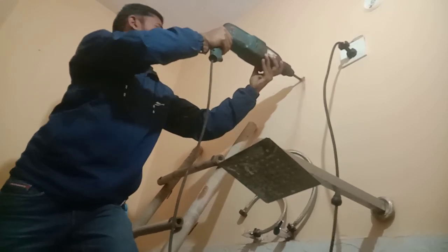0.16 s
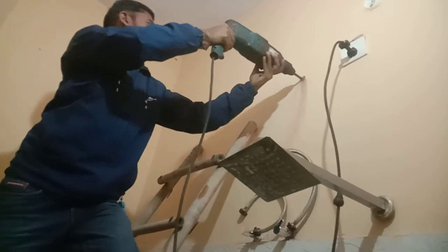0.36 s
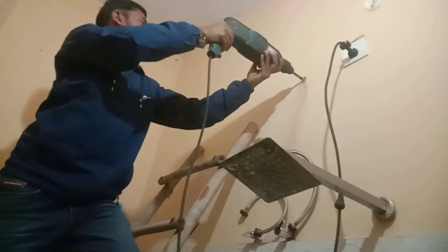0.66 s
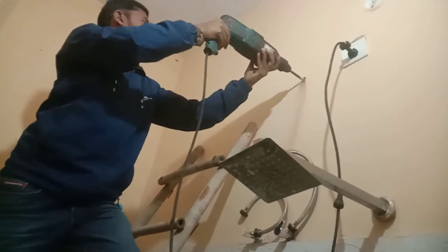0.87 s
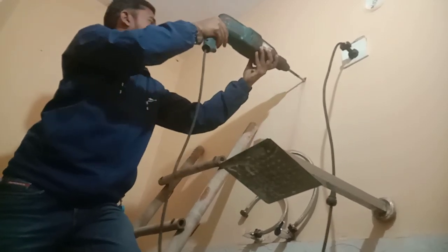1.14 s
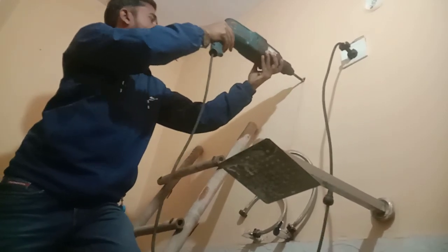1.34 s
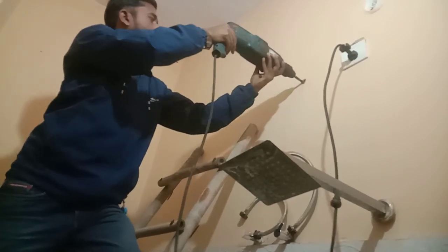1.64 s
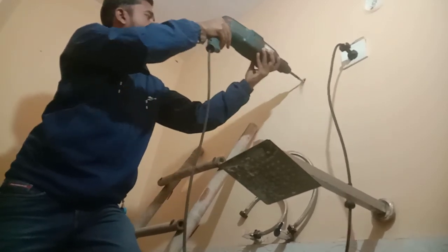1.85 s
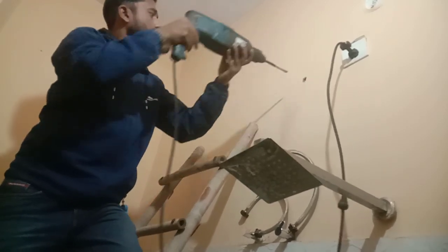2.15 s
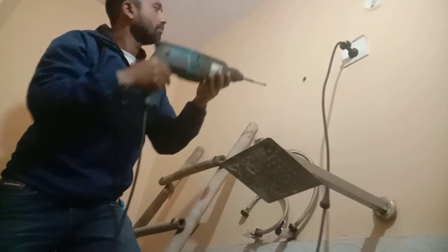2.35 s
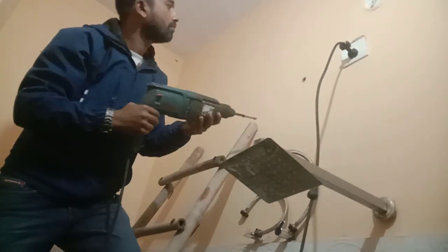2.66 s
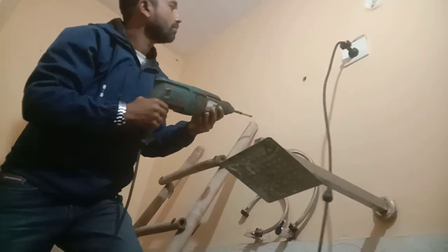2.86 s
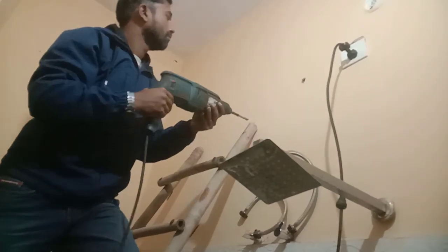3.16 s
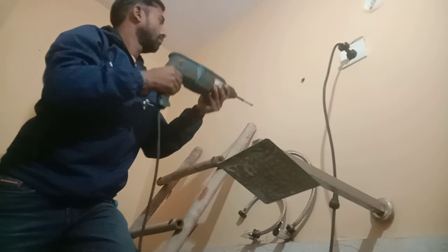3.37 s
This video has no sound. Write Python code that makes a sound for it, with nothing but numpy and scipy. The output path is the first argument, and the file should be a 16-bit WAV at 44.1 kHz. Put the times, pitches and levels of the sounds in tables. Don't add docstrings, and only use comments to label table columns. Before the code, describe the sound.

Loud rotary drill hammering into a wall stops, grinds down and is pulled free, faint rustling after

```python
import sys
import numpy as np
from scipy import signal
from scipy.fft import rfft, irfft, next_fast_len
from scipy.io import wavfile

SR = 44100
rng = np.random.default_rng(int(sys.argv[2]) if len(sys.argv) > 2 else 0)


def bounce(signal):
    frames = np.transpose(np.atleast_2d(signal))
    limited = np.clip(frames, -1, 1)
    pcm = np.round(limited * 32767).astype(np.int16)
    wavfile.write(sys.argv[1], SR, pcm)


def nominal_scale(level):
    x = np.asarray(level, float) / 20
    return 10 ** x


N = 154350

# pitch_hz, level_db (per Hz)
ROOM_TONE = [(40, -17.5), (65, -18), (100, 2.5), (160, -1.5), (260, -16), (700, -26), (3000, -33.5),
             (7000, -33.5), (15500, -42)]
# time_s, level_db
ROOM_TONE_LEVEL = [(0, -66), (1.2, -66), (1.6, -50), (2.1, -56), (2.4, -54.5), (2.6, -59), (3.0, -51),
                   (3.5, -55)]
# start_s, peak_db, centre_hz, t60_s
TICKS = [(2.656, -53, 950, 0.35), (2.66, -55, 400, 0.43), (2.787, -50, 7000, .05),
         (2.826, -52, 2500, 0.082), (2.86, -51, 8000, .1), (3.167, -53.5, 2600, 0.28),
         (3.167, -54, 6200, 0.28), (1.96, -28, 3000, 0.45), (2.12, -59, 5550, .9),
         (2.272, -53.5, 1900, 0.69), (3.30, -61, 1700, 0.57), (3.42, -55, 2107, 0.307)]
# start_s, peak_db, pitch_hz, t60_s
BUMPS = [
    (1.66, -50, 105, 0.25),
    (3.216, -40, 102, 0.12),
]
# time_s, level_db, brightness_db
RUB = [(1.85, -66, 0), (1.94, -39, 8.5), (2.0, -28.5, 3.5), (2.06, -39.5, 4), (2.17, -59, -3),
       (2.262, -58, 9), (2.275, -50, -1), (2.43, -44.5, -1), (2.5, -48.5, 6), (2.6, -44, 2.5),
       (2.69, -43.5, -5), (2.76, -60, 0), (2.85, -57.5, 5.5), (2.92, -55.5, -1), (3.02, -69.5, 3),
       (3.28, -69, 7.5), (3.43, -52, -0.5), (3.5, -63, 5)]
# pitch_hz, level_db (per Hz)
CLOTH = [(300, -19.5), (950, -3.5), (1250, 1.5), (2700, 2), (5000, 1.5), (7000, -1), (10000, -5.5),
         (15500, -14.5)]
# centre_s, length_s, level_db
CASING_RING = [
    (0.802, 0.29, -43),
    (1.423, 0.041, -30),
    (1.654, 0.028, -37),
    (1.817, .08, -50.5),
    (2.424, .05, -67),
    (2.654, 0.034, -61),
    (2.841, 0.046, -64.5),
]
# time_s, level_db
GRIND = [(0, -17.5), (.5, -15.5), (1.0, -18.5), (1.62, -19.5), (1.68, -22), (1.72, -20.5), (1.78, -28),
         (1.93, -34), (2.0, -54), (2.15, -73)]
# pitch_hz, level_db (per Hz)
CASING = [(150, -39), (350, -27), (750, -11), (1200, -9), (2200, -1.5), (4000, -4.5), (9000, -16.5),
          (15500, -27)]
# start_s, peak_db
CHATTER = [
    (1.445, -34),
    (1.524, -22.5),
    (1.605, -27),
    (1.715, -50),
    (1.799, -41),
    (1.91, -48),
    (1.957, -53),
]
# time_s, pitch_hz, level_db
WHINE = [(0, 4146, -40), (.42, 4106, -42.5), (.52, 4326, -36), (.72, 3830, -28), (.9, 3022, -33),
         (1.0, 2530, -26), (1.1, 2200, -24.5), (1.22, 1837, -25), (1.38, 1340, -32), (1.5, 1080, -41.5),
         (1.6, 780, -33.5), (1.7, 550, -78)]
# time_s, level_db
HAMMER = [(0, -14.5), (.03, -12.5), (.3, -14.5), (.34, -15.5), (.4, -14.5), (.55, -19), (.68, -23),
          (1.0, -30.5), (1.3, -43), (1.7, -65), (1.8, -74.5)]
# pitch_hz, level_db (per Hz)
WALL = [(60, -22.5), (250, -11.5), (700, -3), (1200, -4), (2500, -4.5), (5000, 0), (9000, -8),
        (15500, -11.5)]
# multiple of the blow rate, level_db
THUD = [(1, -27.5), (1.4, -27.5), (2, -26), (3, -28), (5, -38), (6, -23)]
# centre_s, length_s, level_db
SQUEAL = [
    (0.121, .03, -53.5),
    (0.273, .04, -46),
    (.40, .04, -50),
]
# pitch_hz, width_hz, level_db
MIC = [(1257, 150, 5.5), (2100, 50, 4), (2613, 130, 2), (3167, 69, 0.5), (4640, 1200, -6), (5606, 100, 3),
       (6200, 150, -9), (6700, 330, 3.5), (8090, 820, -14), (12960, 4100, -18.5), (15000, 900, 8.5)]


def rms_one(x):
    return x / np.sqrt(np.mean(x ** 2) + 1e-20)


def in_time(rows):
    time_s, *columns = np.transpose(rows)
    return [np.interp(np.arange(N) / SR, time_s, column) for column in columns]


def drift(rate_hz):
    pole = np.exp(-80 * np.pi * rate_hz / SR)
    noise = rng.standard_normal(N // 40 + 2002)
    slow = signal.lfilter([1], [1, -2 * pole, pole * pole], noise)[2000:]
    return np.interp(np.arange(N) / 40, np.arange(len(slow)), rms_one(slow))


def narrow(turns, width_hz):
    phase = 2 * np.pi * turns
    return rms_one(drift(width_hz) * np.sin(phase) + drift(width_hz) * np.cos(phase))


def coloured(x, spectrum, patchy_db):
    hz = np.fft.rfftfreq(N, 1 / SR) + 1
    points = np.array(spectrum)
    shaped = rfft(x) * nominal_scale(np.interp(np.log(hz), np.log(points[:, 0]), points[:, 1]))
    place = np.clip(2 * np.log2(hz / 40), 0, 17)
    total = 0
    for k in range(18):
        band = irfft(shaped * np.clip(1 - abs(place - k), 0, 1), N)
        total = total + nominal_scale(patchy_db * drift(14)) * band
    return rms_one(total)


def burst(start_s, db, t60_s, low_hz, high_hz):
    t = np.arange(N) / SR - start_s
    edges = np.clip([low_hz, high_hz], 20, .45 * SR)
    band = signal.butter(2, edges, "band", fs=SR, output="sos")
    noise = rms_one(signal.sosfilt(band, rng.standard_normal(N)))
    rise = np.clip(t / .002, 0, 1)
    return noise * nominal_scale(db - 60 * np.clip(t, 0, 9) / t60_s) * rise


def swells(rows):
    t = np.arange(N) / SR
    return sum(nominal_scale(db) * np.exp(-((t - s) / length) ** 2) for s, length, db in rows)


def room_tone():
    tone = coloured(rng.standard_normal(N), ROOM_TONE, patchy_db=2.5)
    return nominal_scale(in_time(ROOM_TONE_LEVEL)[0]) * tone


def handling():
    ticks = sum(burst(s, db, t60, hz * 0.7, hz * 1.25) for s, db, hz, t60 in TICKS)
    bumps = sum(burst(s, db, t60, hz * 0.42, hz * 0.86) for s, db, hz, t60 in BUMPS)
    return ticks + bumps


def rubbing():
    grains_per_s, grain_db, bright_above_hz = 2200, -13.5, 3100
    caught = rng.random(N) < grains_per_s / SR
    force = nominal_scale(3.2 * np.minimum(rng.exponential(1, N), 3))
    grains = caught * rng.standard_normal(N) * force
    source = rng.standard_normal(N) + nominal_scale(grain_db) * rms_one(grains)
    rub = coloured(source, CLOTH, patchy_db=1.2)
    db, bright_db = in_time(RUB)
    low = signal.sosfiltfilt(signal.butter(4, bright_above_hz, fs=SR, output="sos"), rub)
    return nominal_scale(db + 0.51 * drift(25)) * (low + nominal_scale(bright_db) * (rub - low))


def casing_ring():
    mode_hz, width_hz = 1260, 60
    turns = mode_hz * np.arange(N) / SR
    return swells(CASING_RING) * (np.sin(2 * np.pi * turns) + narrow(turns, width_hz))


def grinding():
    rough = rng.standard_normal(N) * nominal_scale(1.2 * drift(90))
    grind = nominal_scale(in_time(GRIND)[0]) * coloured(rough, CASING, patchy_db=0.0)
    t60_s, low_hz, high_hz = 0.08, 4040, 17000
    chatter = sum(burst(s, db, t60_s, low_hz, high_hz) for s, db in CHATTER)
    return grind + chatter


def rotor():
    blades, width_hz, sideband_db = 13.0, 85, -7
    hum_db, hum_db_per_octave = -40, 27.5
    hz, db = in_time(WHINE)
    turns = np.cumsum(hz / blades) / SR
    whine = 0.83 * np.sin(2 * np.pi * blades * turns) + narrow(blades * turns, width_hz)
    wobble = 1 + 2 * nominal_scale(sideband_db) * np.cos(2 * np.pi * turns)
    hum = np.sin(2 * np.pi * turns) + .5 * narrow(turns, 5.2)
    hum_level = nominal_scale(hum_db + hum_db_per_octave * np.log2(hz / hz.max()))
    return nominal_scale(db) * whine * wobble + hum * hum_level


def hammer():
    blows_hz, sag_hz_per_s, release_s = 76.55, 60, .45
    burst_share, decay_per_cycle = 0.2, 1.5
    thud_ends_s, thud_fade_s = 0.504, 0.026
    t = np.arange(N) / SR
    rate_hz = np.clip(blows_hz - sag_hz_per_s * np.clip(t - release_s, 0, 9), 5, 99)
    blows = np.cumsum(rate_hz) / SR
    strength = nominal_scale(rng.normal(0, 0.83, 400))[blows.astype(int)]
    bursts = rms_one(strength * np.exp(-decay_per_cycle * (blows % 1)))
    beat = 1 - burst_share + burst_share * bursts
    crush = coloured(beat * rng.standard_normal(N), WALL, patchy_db=-1.5)
    thud = 0
    for multiple, db in THUD:
        tone = np.sin(2 * np.pi * (multiple * blows + rng.random()))
        thud = thud + nominal_scale(db + 1.5 * drift(6)) * tone
    fade = np.minimum(t / 0.018, 1) / (1 + np.exp((t - thud_ends_s) / thud_fade_s))
    squeal_hz, squeal_width_hz = 15300, 350
    squeal = swells(SQUEAL) * narrow(squeal_hz * t, squeal_width_hz)
    return nominal_scale(in_time(HAMMER)[0]) * crush + nominal_scale(-12.5) * fade * thud + squeal


def room(x):
    t60_s, tail_db, wall_cut_hz = 0.15, -4, 5000
    flutter_hz, flutter_gain = 180.5, .3
    size = next_fast_len(N + SR)
    w = 2 * np.pi * np.fft.rfftfreq(size, 1 / SR)
    dull = 1 / (1 + 1j * w / (2 * np.pi * wall_cut_hz))
    tail = 0
    for k, lag_s in enumerate(rng.uniform(.011, .033, 10)):
        loop = nominal_scale(-60 * lag_s / t60_s) * dull * np.exp(-1j * w * lag_s)
        tail = tail + (-1) ** k * loop / (1 - loop)
    tail = tail / np.sqrt(10)
    flutter = 1 / (1 - flutter_gain * dull * np.exp(-1j * w / flutter_hz))
    return irfft(rfft(x, size) * flutter * (1 + nominal_scale(tail_db) * tail), size)[:N]


def scene():
    side_db = -43.5
    background = room_tone()
    sources = handling() + rubbing() + casing_ring() + grinding() + rotor() + hammer()
    mid = room(sources) + background
    side = nominal_scale(side_db + 5.9 * drift(5)) * mid * drift(40)
    return np.array([mid + side, mid - side])


def top_cut(x):
    return signal.sosfilt(signal.butter(12, 16890, fs=SR, output="sos"), x)


def record(dry):
    low_cut_hz, top_cut_hz = 53, 15490
    x = signal.sosfilt(signal.butter(3, low_cut_hz, "high", fs=SR, output="sos"), dry)
    for hz, width_hz, db in MIC:
        g, w = nominal_scale(db / 2), 2 * np.pi * hz / SR
        q = np.tan(np.pi * width_hz / SR)
        zeros = [1 + q * g, -2 * np.cos(w), 1 - q * g]
        poles = [1 + q / g, -2 * np.cos(w), 1 - q / g]
        x = signal.lfilter(zeros, poles, x)
    x = signal.sosfilt(signal.ellip(16, .5, 90, top_cut_hz, fs=SR, output="sos"), x)
    return top_cut(x)


dry = scene()
out = record(dry)
bounce(out)
```